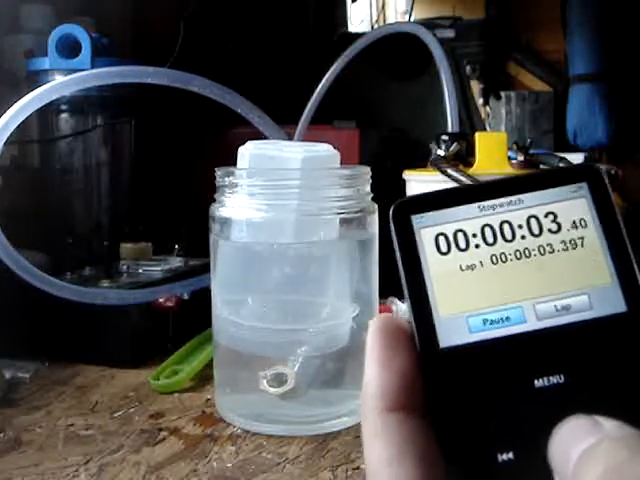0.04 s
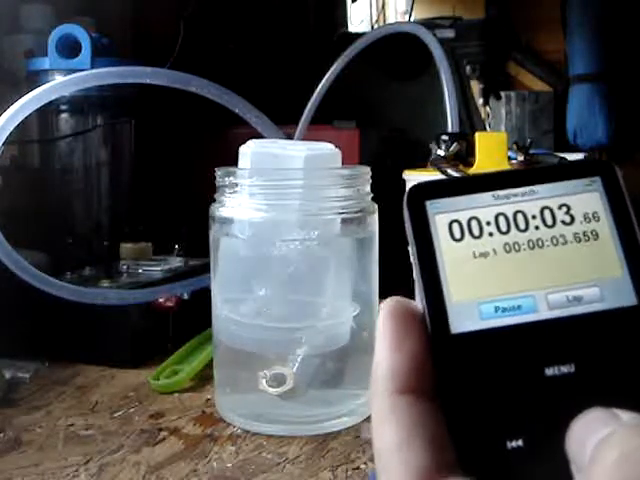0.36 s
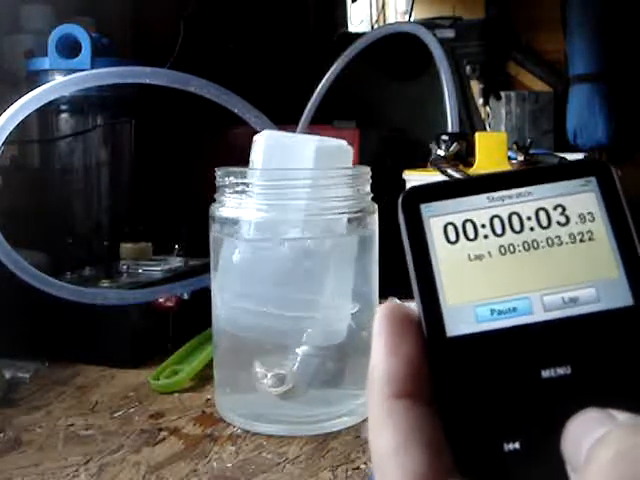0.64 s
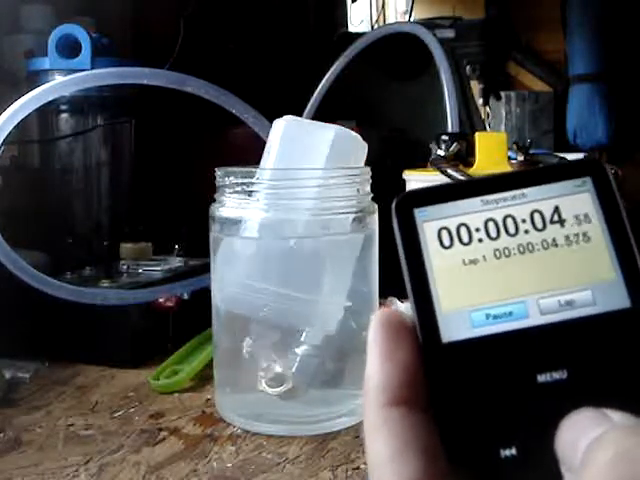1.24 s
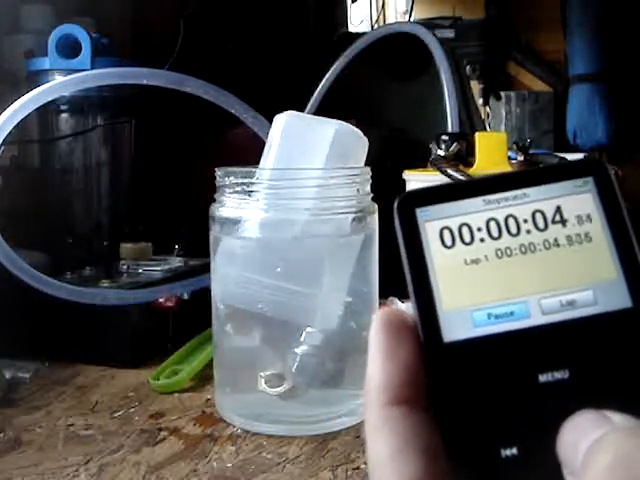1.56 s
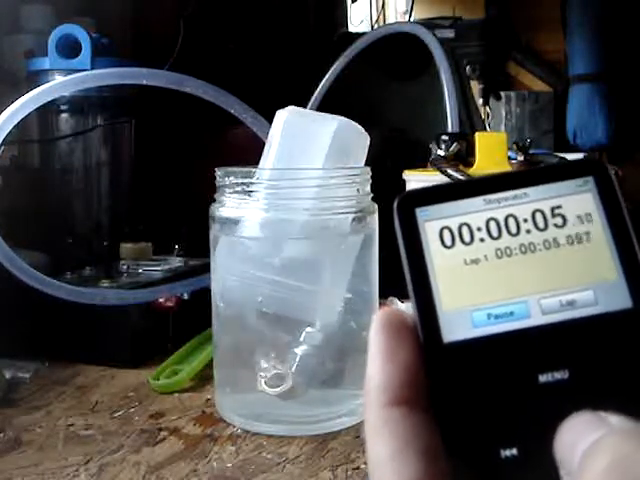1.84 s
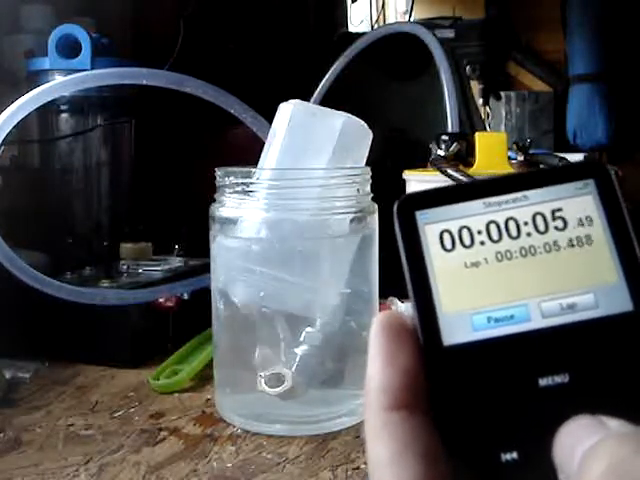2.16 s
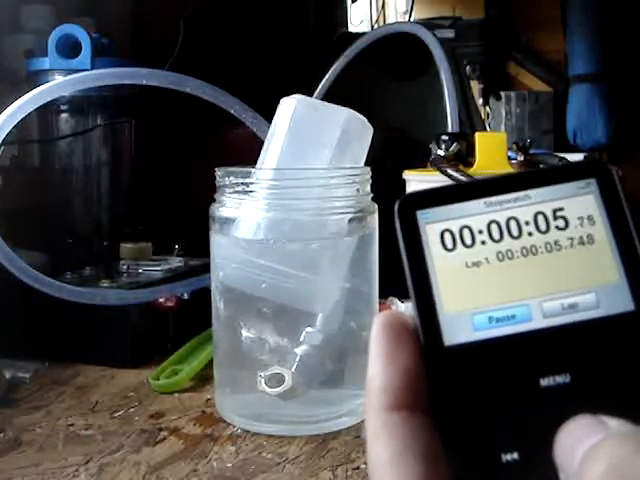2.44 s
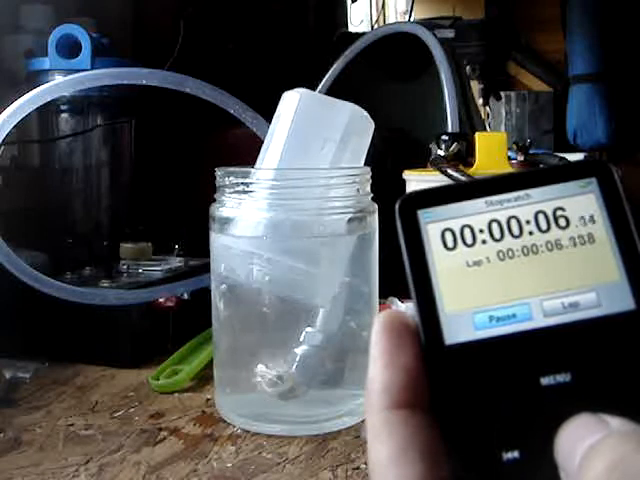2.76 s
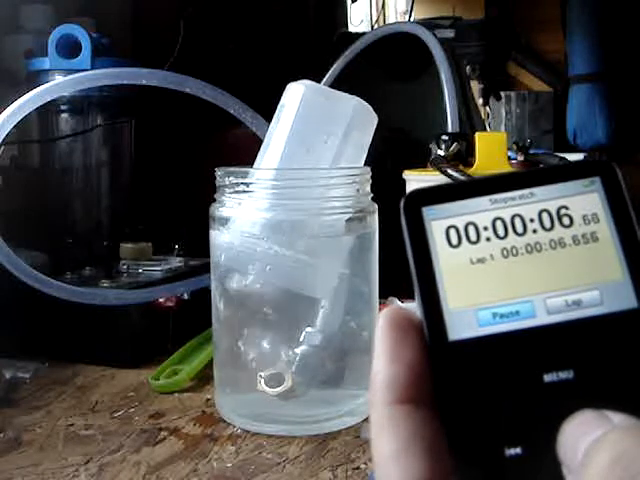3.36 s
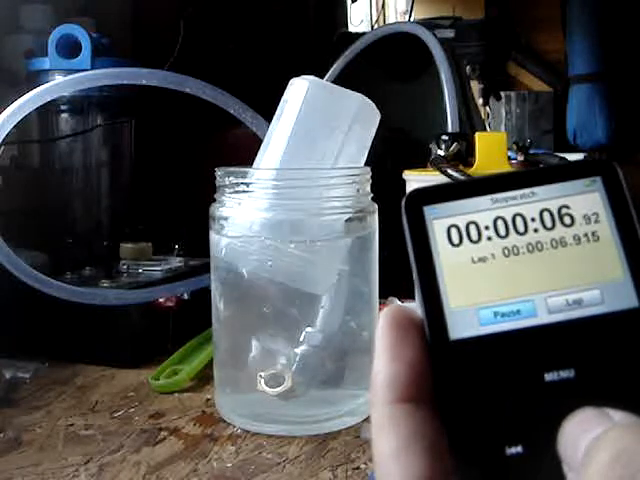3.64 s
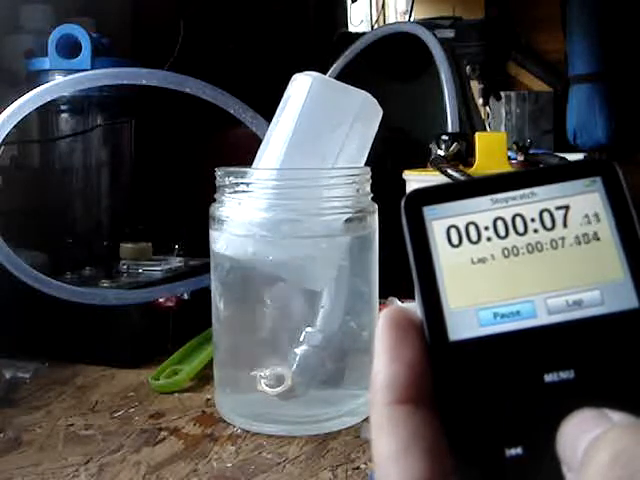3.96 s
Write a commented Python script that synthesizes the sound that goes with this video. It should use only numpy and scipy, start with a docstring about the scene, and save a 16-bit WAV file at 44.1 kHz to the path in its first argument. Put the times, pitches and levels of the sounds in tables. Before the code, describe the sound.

Gas bubbles through water in a glass jar, close by, for all four seconds. Short, low glugs come unevenly, about ten a second, mixed with small plinks, bright pops and a faint fizz. The bubbling is loudest from about 1.3 to 2.3 seconds, with a few sharper snaps, then eases slightly after 3 seconds. Equipment hisses softly and steadily behind it in a small workshop with little echo.

```python
"""In a small workshop, gas from a hose bubbles through water in a glass jar on a workbench.
Each large bubble leaves the nozzle with a short, low glug that shakes the jar and the bench.
Smaller bubbles plink under water or burst at the surface, which rings the air in the jar.
The tiniest ones fizz and prickle. Nearby, equipment hisses steadily."""
import sys
import numpy as np
from scipy import signal
from scipy.fft import rfft, irfft
from scipy.io import wavfile

SR = 44100
rng = np.random.default_rng(int(sys.argv[2]) if len(sys.argv) > 2 else 0)


def pcm_store(signal):
    """Save signal as 16-bit PCM."""
    levels = np.round(np.clip(np.atleast_2d(signal), -1, 1) * 32767)
    wavfile.write(sys.argv[1], SR, levels.astype(np.int16).T)


N = 176400
T = np.arange(N) / SR
EVENT_T = T[:SR // 6]  # the clock for one bubble sound, in seconds
SPECTRUM_HZ = np.maximum(np.fft.rfftfreq(N, 1 / SR), 1)


def from_db(db):
    """Turn decibels into a number to multiply a sound by."""
    return 10 ** (np.asarray(db) / 20)


def unit_level(x):
    """Scale a signal so that its average (rms) level is 1."""
    return x / np.sqrt(np.mean(x ** 2) + 1e-20)


def add(out, start_s, sound):
    """Mix a sound in at its start time."""
    i = int(np.clip(start_s * SR, 0, N - 1))
    out[i:i + len(sound)] += sound[:N - i]


def fade(fade_s, t=EVENT_T):
    """A dying curve. The fade time is how long it takes to drop by 60 dB."""
    return np.exp(-np.log(1000) * t / fade_s)


def fade_in(rise_s):
    """Climb from silence to full level, then stay there."""
    return np.minimum(EVENT_T / rise_s, 1)


def gate(rise_s, hold_until_s, fall_s):
    """Turn on smoothly, hold, then turn off smoothly."""
    shape = np.clip(np.minimum(EVENT_T / rise_s, 1 - (EVENT_T - hold_until_s) / fall_s), 0, 1)
    return np.sin(np.pi / 2 * shape) ** 2


def ring(hz, fade_s):
    """A pure tone that dies away."""
    return np.sin(2 * np.pi * hz * EVENT_T) * fade(fade_s)


def glide(hz, hz_per_s):
    """A pure tone whose pitch slides steadily."""
    return np.sin(2 * np.pi * (hz + hz_per_s * EVENT_T / 2) * EVENT_T)


def struck(tones, scatter_db):
    """Ring an object's own tones, each at a new strength and a little detuned by the sloshing water."""
    sound = np.zeros(len(EVENT_T))
    for hz, db, fade_s in tones:
        strength, direction, slosh = rng.standard_normal(3)
        gain = from_db(db + scatter_db * strength) * np.sign(direction)
        sound += gain * ring(hz * (1 + 0.0054 * slosh), fade_s)
    return sound


def spray(low_hz, high_hz, fade_s):
    """A puff of noise that dies away."""
    band = signal.butter(4, [low_hz, high_hz], "band", fs=SR, output="sos")
    return unit_level(signal.sosfilt(band, rng.standard_normal(len(EVENT_T)))) * fade(fade_s)


def shaped_noise(gains):
    """Steady noise with a chosen strength at each frequency."""
    return unit_level(irfft(rfft(rng.standard_normal(N)) * gains, N))


def flutter(depth_db, rate_hz):
    """A random wobble in loudness, mostly slower than the given rate."""
    return from_db(depth_db * shaped_noise(1 / (1 + (SPECTRUM_HZ / rate_hz) ** 2)))


def equipment_hiss():
    """Equipment rushes steadily, with a few narrow peaks; its body and treble flutter separately."""
    # The tone colour of the hiss. Each row: frequency in Hz, relative level in dB.
    colour = [(25, 3.5), (50, 2.5), (72, -2), (100, 4.5), (140, -2.5), (220, 5), (330, 0), (600, 1.5),
              (900, -3.5), (1450, -1.5), (2300, -4.5), (3200, -11), (4500, -11), (5500, -12), (6700, -18.5),
              (8000, -22), (10000, -24.5)]
    # Narrow bands where the equipment resonates. Each row: centre in Hz, width in Hz, boost in dB.
    peaks = [(1440, 65, 6.5), (1844, 167, 5.5), (2043, 20, 8.5), (2191, 36, 12), (2920, 80, 4.5),
             (3432, 38, 11), (4220, 66, 5), (5370, 380, 4.5), (6580, 160, 3.5), (8040, 98, 2.5)]
    # How loud the hiss is. Each row: time in seconds, level in dB.
    loudness = [(0, -44.5), (1.5, -44.5), (2.56, -43.5), (4, -44)]
    colour_hz, colour_db = np.transpose(colour)
    db = np.interp(np.log(SPECTRUM_HZ), np.log(colour_hz), colour_db)
    for centre_hz, width_hz, boost_db in peaks:
        db += boost_db / (1 + (2 * (SPECTRUM_HZ - centre_hz) / width_hz) ** 2)
    noise = shaped_noise(from_db(db))
    body = irfft(rfft(noise) / (1 + (SPECTRUM_HZ / 3900) ** 10), N)  # the part below 3900 Hz
    treble = noise - body
    rush = body * flutter(depth_db=2.5, rate_hz=33) + treble * flutter(depth_db=2.06, rate_hz=85)
    return rush * from_db(np.interp(T, *np.transpose(loudness)))


def room_echo(sound):
    """The workshop throws the sound back as a short, slightly dull blur of echoes."""
    t = T[:SR // 2]
    gap_s, top_hz = 0.0063, 4770
    tail = rng.standard_normal(len(t)) * fade(fade_s=0.15, t=t) * (t > gap_s)
    dull_tail = signal.lfilter(*signal.butter(1, top_hz, fs=SR), tail / np.linalg.norm(tail))
    return signal.fftconvolve(sound, dull_tail)[:N]


def random_bubbles(per_s, base_db, low_hz, high_hz):
    """Pick a start, level and pitch for many small bubbles, louder while the water is stirred more."""
    # How briskly the water is stirred. Each row: time in seconds, change of level in dB.
    stir = [(0, -6), (.35, -1.5), (1.2, -1.5), (1.85, -0.5), (2.15, -6), (2.6, 1), (3.3, -8), (4, 0.5)]
    when, size, pitch = rng.random((int(per_s * N / SR), 3)).T
    start_s = when * N / SR
    extra_db = 1.5 * np.minimum(-np.log(1 - size), 2)  # up to 3 dB, usually less
    db = base_db + extra_db + np.interp(start_s, *np.transpose(stir))
    return zip(start_s, db, low_hz * (high_hz / low_hz) ** pitch)


def prickle():
    """The finest bubbles make faint, high ticks all the time."""
    out = np.zeros(N)
    for start_s, db, hz in random_bubbles(per_s=140, base_db=-49, low_hz=2446, high_hz=5730):
        add(out, start_s, from_db(db) * ring(hz, fade_s=0.011))
    return out


def gurgle():
    """Many faint bubbles ring under water and blend into a gurgle."""
    out = np.zeros(N)
    for start_s, db, hz in random_bubbles(per_s=36, base_db=-44.5, low_hz=291, high_hz=808):
        add(out, start_s, from_db(db) * ring(hz, fade_s=0.088))
    return out


def spits():
    """Clusters of tiny bubbles burst together in a short, rough fizzle."""
    # Each row: start in seconds, relative level in dB, centre in Hz, fade time in seconds.
    clusters = [(.112, -33.5, 3860, 0.17), (.395, -32.5, 4600, 0.16), (.645, -32, 4260, 0.092),
                (.865, -40, 8500, 0.061), (1.018, -34.5, 4270, 0.15), (1.284, -37, 8500, 0.056),
                (1.441, -29.5, 5010, 0.097), (1.539, -36, 2900, 0.059), (1.695, -37, 6900, 0.055),
                (1.712, -23.5, 2700, 0.048), (1.748, -42, 3800, 0.063), (1.975, -19.5, 1700, 0.095),
                (1.752, -27, 1600, 0.26), (2.99, -29, 1380, 0.16), (3.545, -28.5, 1950, 0.2),
                (3.3, -37, 5940, 0.061), (3.375, -35, 5070, 0.23)]
    gain_db, width_octaves = -10.5, 0.67
    edge_ratio = 2 ** (width_octaves / 2)
    out = np.zeros(N)
    for start_s, db, hz, fade_s in clusters:
        fizzle = fade_in(rise_s=0.0072) * spray(hz / edge_ratio, hz * edge_ratio, fade_s)
        add(out, start_s, from_db(db + gain_db) * fizzle)
    return out


def cracks():
    """The tightest bubble skins tear in a few milliseconds, with a dry crack."""
    # Each row: start in seconds, level in dB, top of the noise band in Hz.
    tears = [(.866, -41, 9000), (1.081, -39, 3500), (1.431, -24.5, 5000), (1.5357, -21.5, 3800),
             (1.743, -30, 4800), (1.966, -23, 2200), (3.813, -38, 3200)]
    out = np.zeros(N)
    for start_s, db, top_hz in tears:
        add(out, start_s, from_db(db) * spray(low_hz=684, high_hz=top_hz, fade_s=0.0043))
    return out


def plinks():
    """Small bubbles sing briefly under water, rising a little in pitch."""
    # Each row: start in seconds, relative level in dB, starting pitch in Hz, length in seconds.
    small_bubbles = [(0.103, -39, 1120, 0.026), (0.117, -40, 560, 0.017), (0.238, -34.5, 385, 0.026),
                     (0.286, -41, 398, 0.022), (0.374, -39, 395, 0.031), (.502, -38, 1027, 0.015),
                     (0.725, -31.5, 1810, 0.018), (0.744, -40, 1215, 0.032), (0.863, -37.5, 455, 0.015),
                     (1.43, -31, 1870, 0.014), (1.536, -30.5, 2990, 0.012), (1.562, -37, 2780, 0.0075),
                     (1.675, -31, 765, 0.02), (1.693, -39, 6630, 0.014), (1.696, -41, 7100, 0.0067),
                     (1.807, -32.5, 446, 0.0083), (1.892, -34.5, 845, .017), (1.8978, -25.5, 432, 0.022),
                     (1.925, -38.5, 482, 0.047), (1.953, -33.5, 406, 0.013), (1.982, -34, 640, 0.013),
                     (2.257, -22, 1835, 0.018), (2.345, -39, 655, 0.014), (2.65, -43.5, 646, 0.033),
                     (2.82, -32.5, 1188, 0.026), (2.87, -36.5, 1884, 0.017), (2.962, -35.5, 1340, 0.015),
                     (2.999, -35.5, 560, 0.024), (3.078, -34.5, 1854, 0.0099), (3.198, -39, 273, 0.046),
                     (3.226, -43, 626, 0.019), (3.39, -40.5, 637, 0.017), (3.625, -44, 783, .025)]
    gain_db, climb_per_s = 0.5, 3.6
    out = np.zeros(N)
    for start_s, db, hz, length_s in small_bubbles:
        fall_s = 0.61 * length_s
        shape = gate(rise_s=0.00096, hold_until_s=length_s - fall_s, fall_s=fall_s)
        add(out, start_s, from_db(db + gain_db) * shape * glide(hz, hz * climb_per_s))
    return out


def pops():
    """A bubble's skin snaps; its hollow rings, and so does the jar's air. Faint bursts fizz between."""
    # Bubbles bursting at the surface. Each row: start in seconds, level in dB, pitch in Hz,
    # snap in dB compared with that level, fade time of the hollow in seconds.
    bursts = [(.277, -31, 1436, -21, 0.049), (.351, -34, 3850, -13, 0.041), (.41, -34, 1440, -5, .03),
              (.533, -25, 1896, -12, .05), (.726, -28.5, 1355, -22, 0.038), (.845, -39, 1500, -14, 0.043),
              (.865, -27, 2960, -9, 0.031), (.95, -34.5, 2930, -7, .03), (1.015, -28.5, 1890, -8, .07),
              (1.0795, -21.5, 1800, -27, 0.021), (1.432, -21.5, 1428, -11.5, 0.038),
              (1.536, -24, 2870, -10, 0.039), (1.743, -29, 2910, -3, 0.038),
              (1.966, -22.5, 1868, -21, .045), (1.979, -26, 1233, -12, 0.038), (2.103, -53, 1880, 1, 0.027),
              (2.345, -30, 1520, -11, .06), (2.507, -26, 1770, -22, 0.023),
              (2.535, -30.5, 1660, -10, 0.036), (2.664, -34, 1910, -19, 0.04),
              (2.804, -24.5, 1860, -31, 0.048), (2.823, -29, 1153, -23, 0.047),
              (2.835, -31, 1365, -26, 0.078), (2.871, -45, 1970, -20, .04), (3.08, -35, 1930, -13, 0.037),
              (3.18, -34.5, 1820, -4, 0.024), (3.224, -31, 1916, -13, 0.031), (3.373, -37, 1820, -5, .03),
              (3.447, -38.5, 1930, -3, .04), (3.813, -36.5, 2220, -10, .04), (3.853, -32.5, 2250, -20, .05)]
    # The tones of the air in the jar. Each row: pitch in Hz, relative level in dB, fade time in seconds.
    air_tones = [(1172, -16.5, 0.12), (1367, -14, 0.087), (1521.5, -9, 0.045), (1725, -9.5, 0.035),
                 (1876, -12.5, 0.074), (2030, -31.5, 0.061), (2687, -16, .03), (2905, -29.5, 0.017)]
    fizz_snap_db, fizz_fade_s, hollow_db, loss_db_per_octave = -8, 0.036, -1, 1.5
    faint_bubbles = random_bubbles(per_s=60, base_db=-42, low_hz=1065, high_hz=2523)
    fizz = [(start_s, db, hz, fizz_snap_db, fizz_fade_s) for start_s, db, hz in faint_bubbles]
    out = np.zeros(N)
    for start_s, db, hz, snap_db, fade_s in list(bursts) + fizz:
        snap = from_db(snap_db) * spray(low_hz=865, high_hz=4600, fade_s=0.039)
        hollow = from_db(hollow_db) * ring(hz, fade_s)
        # Jar tones far from the bubble's pitch are rung more weakly.
        rung_tones = [(air_hz, air_db - loss_db_per_octave * abs(np.log2(air_hz / hz)), air_fade_s)
                      for air_hz, air_db, air_fade_s in air_tones]
        jar_air = struck(rung_tones, scatter_db=4.5)
        add(out, start_s, from_db(db) * fade_in(rise_s=0.002) * (hollow + jar_air + snap))
    return out


def glugs():
    """A large bubble's tone swells and sags for a few cycles; it shakes the jar and splashes a little."""
    # Bubbles leaving the nozzle. Each row: start in seconds, level in dB, starting pitch in Hz,
    # splash in dB compared with that level.
    large_bubbles = [(0.064, -36, 219, -9), (0.09, -28.5, 228, -15), (0.234, -31, 252, -16),
                     (.262, -34.5, 285, -26), (.368, -37, 218, -7), (0.473, -34, 202, -17),
                     (0.506, -28.5, 210, -8), (0.582, -26.5, 207, -29), (.643, -33.5, 216, -7),
                     (0.771, -36.5, 229, -14), (.785, -31, 211, -28), (0.932, -25, 213, -33),
                     (1.065, -27.5, 217, -36), (1.213, -27, 218, -13.5), (1.284, -23.5, 203, -26),
                     (1.322, -21.5, 219.6, -44), (1.453, -27.5, 222, -13), (1.557, -25.5, 218, -19),
                     (1.598, -28.5, 226, -26), (1.679, -21.5, 210, -37), (1.807, -27.5, 209, -32),
                     (1.847, -29, 214, -31), (1.864, -31, 228, -35), (1.899, -23, 205, -38),
                     (1.952, -21, 204.5, -39), (2.103, -37, 211, -14), (2.203, -26, 224, -11),
                     (2.235, -24.5, 207, -20.5), (2.491, -32, 219, -34), (2.603, -30.5, 212, -14),
                     (2.766, -28, 213, -31), (2.899, -34.5, 220, -19), (3.174, -29.5, 226, -11),
                     (3.394, -27.5, 199, -11), (3.585, -36.5, 213, -14), (3.716, -31.5, 218, -10),
                     (3.849, -34.5, 217, -25), (3.977, -35, 213, -30)]
    # Low tones of the jar and bench. Each row: pitch in Hz, relative level in dB, fade time in seconds.
    body_tones = [(97.1, -16, 0.39), (120.8, -20, 0.14), (190, -28.5, 0.1), (222, -20, 0.37),
                  (283, -17, 0.33), (373.5, -15, 0.12), (464, -21, 0.11), (562.6, -24, 0.23),
                  (783, -32, 0.068)]
    start_db, swell_db_per_s, swell_s = -4.5, 311, 0.01494
    swell = from_db(start_db + swell_db_per_s * np.minimum(EVENT_T, swell_s))
    shape = swell * gate(rise_s=0.00083, hold_until_s=swell_s, fall_s=0.004)
    out = np.zeros(N)
    for start_s, db, hz, splash_db in large_bubbles:
        tone = shape * glide(hz, hz_per_s=-680)
        splash = fade_in(rise_s=0.0028) * spray(low_hz=397, high_hz=4030, fade_s=0.037)
        shake = struck(body_tones, scatter_db=1.5)
        add(out, start_s, from_db(db) * (tone + shake + from_db(splash_db) * splash))
    return out


def scene():
    """Mix the hiss, the bubbling jar close by and the jar's echoes in the room."""
    hiss = equipment_hiss()
    under_water = glugs() + plinks() + gurgle()
    surface = pops() + spits() + cracks() + prickle()
    echoes = room_echo(from_db(-11.5) * under_water + from_db(-5) * surface)
    return (hiss + under_water + surface + echoes)[None]


def record(dry):
    """The small microphone loses the deep bass, and the highest treble is cut off steeply."""
    low_hz, top_hz = 71.6, 9950
    bass_cut = signal.butter(2, low_hz, "high", fs=SR, output="sos")
    treble_cut = signal.ellip(12, .1, 80, top_hz, fs=SR, output="sos")
    return signal.sosfilt(treble_cut, signal.sosfilt(bass_cut, dry))


dry = scene()
out = record(dry)
pcm_store(out)
```